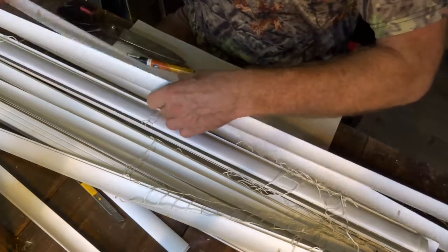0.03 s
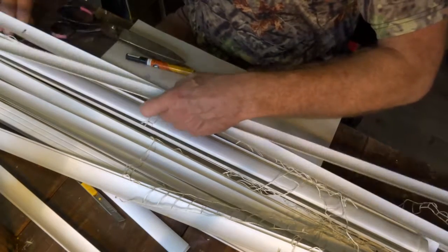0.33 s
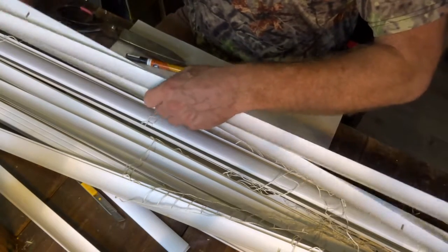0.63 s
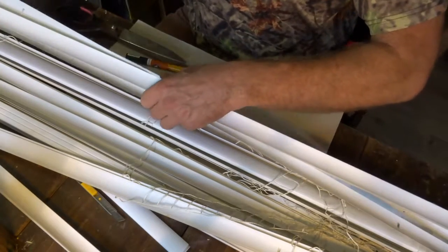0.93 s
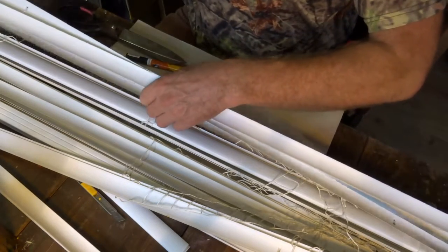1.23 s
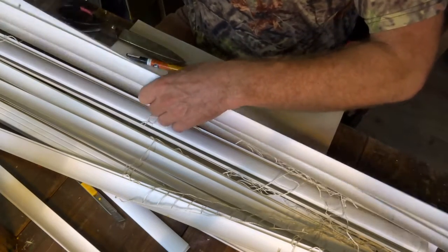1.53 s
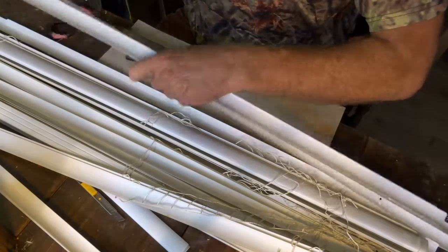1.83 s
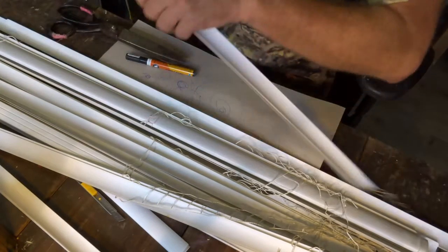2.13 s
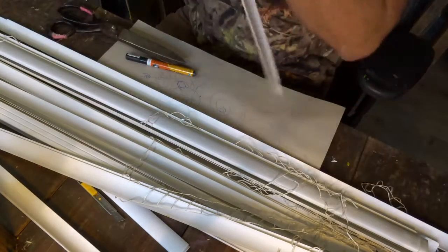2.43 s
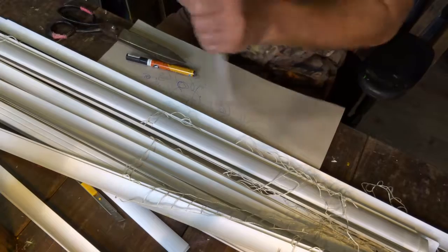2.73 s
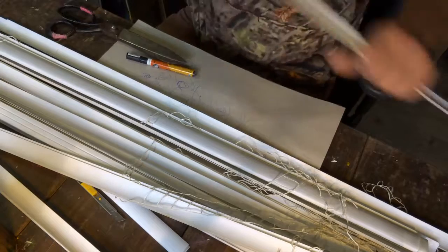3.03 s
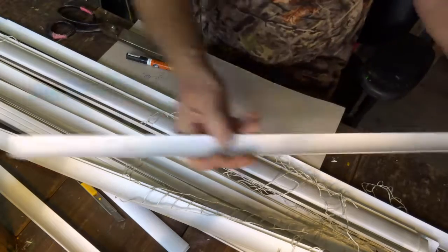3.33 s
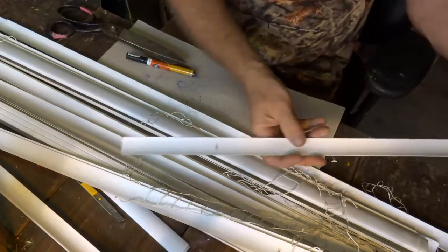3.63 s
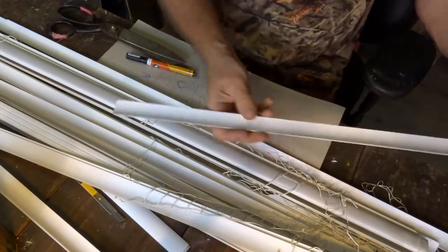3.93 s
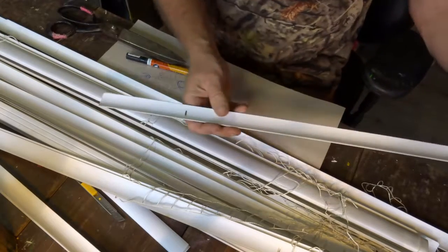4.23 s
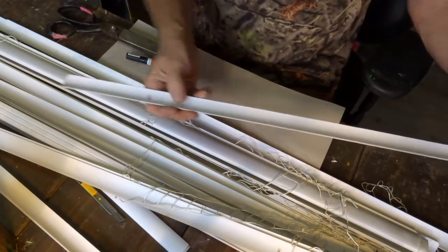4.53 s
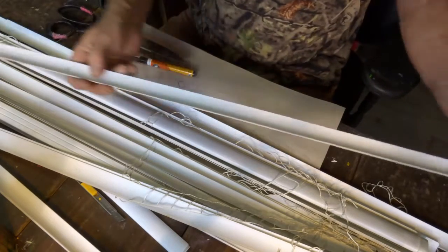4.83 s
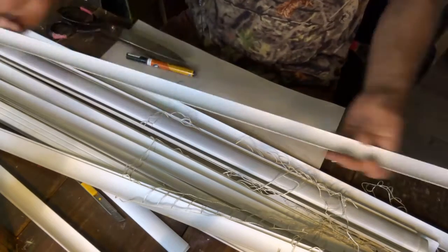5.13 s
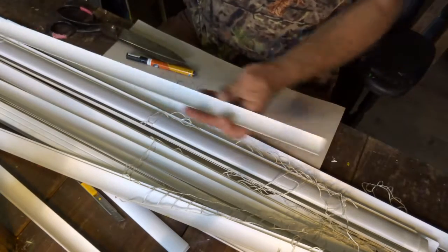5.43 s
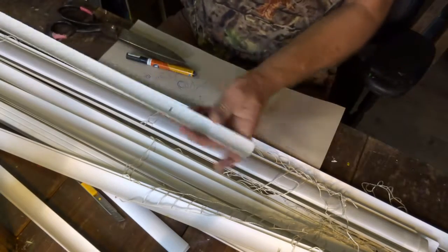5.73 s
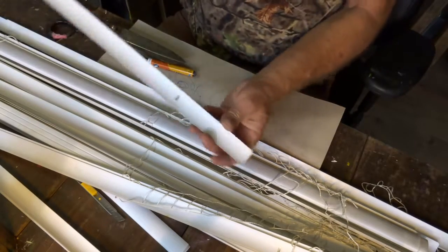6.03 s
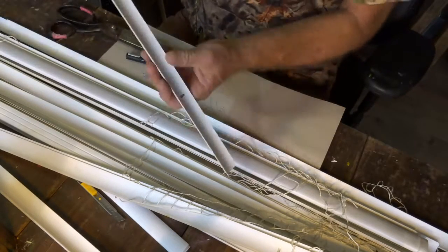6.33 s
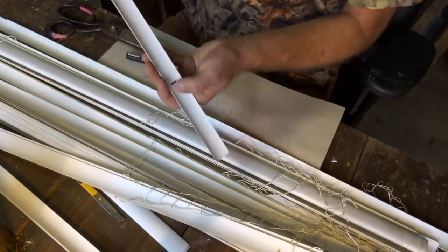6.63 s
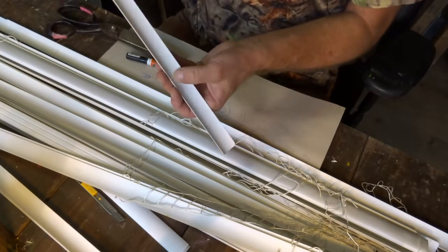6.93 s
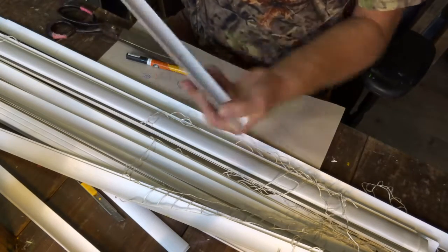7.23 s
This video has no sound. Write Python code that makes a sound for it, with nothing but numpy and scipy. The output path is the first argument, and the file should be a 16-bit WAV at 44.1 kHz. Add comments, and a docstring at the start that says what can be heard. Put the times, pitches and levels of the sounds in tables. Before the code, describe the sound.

Long plastic blind slats click and scrape as one is tugged out of a pile on a workbench, its thin edges snapping past the others. Its end then chatters against something solid in a loud, hollow clatter with dull thumps. Afterwards dry skin hisses softly along the slat in several strokes. The sounds are close, in a small, quiet workshop with short echoes.

```python
"""Long plastic blind slats click, scrape and knock as they are handled on a workbench.
One slat is tugged out of the pile: its thin edges catch and snap past the others. It is swung round,
and its end chatters and thumps against something solid. Then dry skin hisses along it in several strokes.
Each hit is a short push that makes the parts ring; each slide is a stream of tiny slips.
The small, quiet workshop adds short echoes, soft room noise and a thin, very high whine."""
import sys
import numpy as np
from scipy import signal
from scipy.fft import rfft, irfft
from scipy.io import wavfile
from scipy.ndimage import uniform_filter1d, map_coordinates

SR = 44100
rng = np.random.default_rng(int(sys.argv[2]) if len(sys.argv) > 2 else 0)


def store_pcm(level_fs):
    """Save levels as 16-bit WAV."""
    pcm = np.round(np.clip(level_fs, -1, 1) * 32767).astype(np.int16)
    wavfile.write(sys.argv[1], SR, np.atleast_2d(pcm).T)


N = 321048
TIME = np.arange(N) / SR

# Thin slat edges snap past each other. The "spot" is the place that is hit; it has a pitch of its own.
# (time [s], tick level [dB], clack compared with tick [dB], base ring time [s], spot pitch [Hz])
CLICKS = [(.1614, -10.5, -5, 0.023, 4040), (.208, -4.5, -5, .008, 12000), (0.253, -14, -7, 0.065, 9700),
          (.378, -19, -10, .01, 1980), (0.4008, -21, 3, .04, 1250), (0.4054, -7, -8, 0.032, 1130),
          (0.5217, -9.5, 2.5, 0.015, 2790), (.7495, -16, 2.5, 0.016, 2160), (.902, -15.5, -13, .024, 5900),
          (.9537, -18, -10.5, .041, 5330), (1.0778, -16, -24, .04, 9050), (1.3228, 1.5, -7, 0.021, 6900),
          (1.4198, -17.5, -9, 0.017, 1840), (1.653, -19, -16, .023, 3610), (1.6795, 1.5, -14, 0.0043, 5070),
          (1.7232, -13, -16, 0.036, 4550), (1.7448, -2, -5, 0.023, 5930),
          (1.788, -6.5, -6.5, 0.0089, 11800), (1.8781, -10, -19, 0.016, 3400),
          (1.8923, -7, -2.5, 0.01, 5940), (1.941, -16, 2, 0.037, 2340), (1.9649, -6.5, -8.5, 0.0085, 6000),
          (2.0794, -3, -12, .007, 7500), (2.0846, 0, -7.5, 0.0083, 8400), (2.0982, -1.5, -16, 0.068, 9800),
          (2.107, 0, -10, 0.067, 4660), (2.178, -7, -8, .08, 5550), (2.183, -3, -8, 0.064, 5760),
          (2.1893, 1, -11.5, 0.018, 5300), (2.2658, -8, -3.5, 0.02, 2000), (2.3021, -4, -14, 0.0066, 6300),
          (2.87, -1, -29, 0.023, 10600), (2.8748, 0, -25, 0.0056, 5940), (3.3602, -11, -13.5, 0.31, 12000),
          (3.4185, -8, -24, 0.025, 5940), (3.425, -5, -13, 0.022, 5830), (3.4616, -12.5, -6, 0.02, 3250),
          (3.4765, -11.5, -5.5, 0.05, 6200), (7.1259, -18, -13, 0.047, 2360)]
# A slat lands flat or its end chatters: (time [s], clack level [dB], base ring time [s], spot pitch [Hz])
CLACKS = [(0.4125, -9.5, 0.015, 1150), (0.5267, -9, 0.12, 1380), (0.8136, -17, .02, 1450),
          (1.334, -4, 0.015, 1120), (2.24, -13.5, 0.043, 1420), (2.6844, 2.5, 0.0098, 1350),
          (2.703, 4, 0.018, 1420), (2.711, -1, 0.019, 1610), (2.7159, 6, 0.012, 1540),
          (2.7226, 3, 0.039, 1790), (2.742, 6, .054, 1440), (2.7914, -6.5, 0.064, 1580),
          (2.861, -1, .02, 1350)]
# Something heavy takes the blow: (time [s], thud level [dB], base ring time [s], spot pitch [Hz])
THUMPS = [(0.5708, -15, 0.02, 545), (.648, -26, 0.036, 337), (2.7261, -4.5, 0.059, 346),
          (2.7488, -3, 0.059, 324), (2.786, -0.5, .022, 386), (2.8007, -8, .03, 566),
          (1.652, -25, 0.037, 300), (5.897, -32, .04, 340)]
# Tugs drag a slat over the others: (start [s], length [s], hiss strength [dB], scrape strength [dB])
TUGS = [(-.06, 0.1, -45, -51.5), (0.07, 0.22, -47.5, -50.5), (0.229, 0.085, -39, -49.5),
        (0.266, .2, -48, -49.5), (0.547, 0.2, -43.5, -49.5), (0.783, .32, -48.5, -52),
        (1.03, 0.09, -44, -60), (1.067, 0.076, -38, -48.5), (1.245, .07, -50.5, -59),
        (1.328, 0.08, -37.5, -59), (1.561, 0.12, -50.5, -52.5), (1.633, 0.14, -38.5, -39.5),
        (1.698, 0.082, -31.5, -39.5), (1.8, 0.076, -35, -39.5), (1.875, 0.21, -55, -56),
        (2.098, 0.1, -35, -42.5), (2.195, 0.17, -32, -49), (2.323, 0.16, -54.5, -60),
        (2.485, .12, -51, -56), (2.69, 0.17, -36, -38), (2.84, 0.082, -27, -47)]
# Slats shift under the hand: (time [s], scrape strength [dB])
SHIFTING = [(0, -55.5), (1.0, -55), (1.2, -60.5), (1.55, -70), (2.0, -49), (2.6, -63.5)]
# Strokes of skin along the slat:
# (start [s], length [s], hiss strength [dB], extra for the low rub [dB], extra for the finest hiss [dB])
WIPES = [(2.92, .12, -44, -10, -3), (3.0, .12, -40.5, -8, 0.5), (3.11, 0.072, -42, -3, -8),
         (3.17, 0.17, -45.5, -10, -3), (3.579, 0.047, -51.5, -5.5, -3), (3.68, 0.13, -51.5, -7.5, -5),
         (3.75, 0.086, -46, -13.5, -5), (3.82, 0.11, -43, -17, -8), (3.91, 0.19, -48.5, -16, -7),
         (4.4, 0.31, -52.5, -6.5, -10), (4.479, 0.23, -45.5, -10.5, -2), (4.98, 0.22, -60, -28, -3),
         (5.33, .14, -63.5, -24, 3), (5.47, .06, -56, -2.5, -19), (5.658, 0.22, -42.5, -14, -8),
         (5.84, 0.087, -53, -10, -12), (6.09, 0.19, -50, -14, -2), (6.2, 0.23, -41, -18.5, -4.5),
         (6.48, 0.085, -55, -27, -23), (6.56, .13, -49.5, -28, -12), (6.77, .2, -50.5, -14.5, -13),
         (7.09, 0.072, -45, -20, -23), (7.16, 0.16, -43, -17, -13)]

# The notes a part rings with when hit. A ring time (t60) is how long a sound takes to fade by 60 dB.
# (pitch [Hz], relative level [dB], ring time [s])
SLAT_NOTES = [(1155, -1, 0.21), (1250, -2, .13), (1323, -14, 0.24), (1454, -7.5, 0.082), (1616, 5, .13),
              (1690, -9, 0.043), (1930, -1, 0.063), (2163, -7, 0.066), (2830, 13, 0.1)]  # a bending slat
THUD_NOTES = [(233.4, 4, 0.11), (318, 6.5, 0.093), (353, 2.5, 0.2), (509.7, 8, 0.11), (637, 2, 0.25)]  # the heavy things it strikes
BOOM_NOTES = [(110, -1, 0.24), (133, -16, .25), (177, -5, 0.15), (234, 9, 0.29)]  # their deepest notes, heard only after hard blows

# A colour says how strong a sound is from bass to treble: (frequency [Hz], relative level [dB])
TICK_COLOUR = [(200, -43), (800, -26.5), (2500, 0.5), (4000, 1.5), (5800, 2), (8000, -1.5), (10700, 4.5),
               (12800, -4.5), (15500, -11.5)]  # a slat's thin edge
CLACK_COLOUR = [(60, -82), (200, -48), (600, -8.5), (900, 0), (1400, 0.5), (2100, 2.5), (3200, -2.5),
                (4500, -9.5), (9000, -17.5), (16000, -38)]  # a slat's hollow knock
THUD_COLOUR = [(40, -36), (100, -22), (170, -15), (240, 3.5), (320, 6), (400, 1.5), (500, 7), (630, 3),
               (800, -4), (1500, -42), (4000, -92)]  # a heavy thing being hit
BOOM_COLOUR = [(30, -22), (75, -25), (95, -12), (115, -7), (165, -6.5), (230, -2), (330, 2), (600, -24),
               (3000, -67)]  # the deep part of that hit
HISS_COLOUR = [(300, -63), (1500, -31), (3200, -25), (5000, -3), (6500, 2), (8000, 1), (10800, 5),
               (12800, -2.5), (15500, -4.5)]  # slat on slat, the bright part
SCRAPE_COLOUR = [(100, -27), (400, -21), (800, 9), (1300, 4.5), (2200, 10.5), (3200, 7), (5000, 5),
                 (10000, -42)]  # slat on slat, the hollow part
SKIN_COLOUR = [(400, -45), (2000, -44.5), (3600, -3.5), (4800, 2.5), (6500, 2), (8200, 0.5), (10000, 7),
               (11400, 8), (12600, -38), (15000, -36)]  # skin on slat, the main hiss
SKIN_LOW_COLOUR = [(200, -32), (900, -3), (1900, -1.5), (2500, 8.5), (3200, 10.5), (4000, 6), (5500, -12.5)]  # its lower rub
SKIN_FINE_COLOUR = [(4000, -58), (10500, -18), (12400, -2.5), (14000, -12), (15800, -10)]  # its finest hiss
AIR_COLOUR = [(25, -19), (60, -16.5), (110, -15), (180, -11.5), (290, -5.5), (700, -4.5), (1280, -3),
              (1860, -6.5), (2800, -5.5), (3900, -9), (9000, -11.5), (11500, -8.5), (13400, -16),
              (14750, -4), (16000, -22)]  # room noise

# Early echoes from the bench, the person and the walls: (delay [s], level [dB])
ECHOES = [(.0040, -8), (.0063, -13.5), (.0087, -22.5), (0.0093, -31)]
# How much a sound spreads to the left and right: (frequency [Hz], side compared with middle [dB])
ECHO_WIDTH = [(60, -26), (150, -56), (300, -44), (600, -15), (1400, -16), (2800, -19), (5000, -13),
              (15000, -11.5)]  # echoes
AIR_WIDTH = [(60, 3), (110, -11), (200, -12.5), (380, -8), (700, -4), (1290, -5), (2380, -8), (4400, -10.5),
             (8120, -15.5), (15000, -17.5)]  # room noise

CLICK_THUD_DB, CLICK_THUD_GROWTH = -26.5, 0.64  # thud under a 0 dB tick; dB it gains per dB of tick
CLACK_TICK_DB, CLACK_THUD_DB = -13, -18.5  # compared with the clack
THUMP_CLACK_DB, THUMP_TICK_DB = -7.5, -7  # compared with the thud
BOOM_DB, BOOM_GROWTH = -2.5, 2.36  # boom under a 0 dB thud; dB it gains per dB of thud
CATCH_S, CATCH_DB = 0.034, -39.5  # an edge hisses around its snap: length; offset from the tick level


def slat_hits():
    """Clicks, clacks and thumps all shake the same parts, each kind in its own mix."""
    parts = (struck_part(BOOM_COLOUR, BOOM_NOTES, notes_db=-14),
             struck_part(THUD_COLOUR, THUD_NOTES, notes_db=-1.5),
             struck_part(CLACK_COLOUR, SLAT_NOTES, notes_db=-9),
             unit(colour(TICK_COLOUR)))
    hits = [(time, CLICK_THUD_DB + CLICK_THUD_GROWTH * db, db + hollow_db, db, t60, hz)
            for time, db, hollow_db, t60, hz in CLICKS]
    hits += [(time, db + CLACK_THUD_DB, db, db + CLACK_TICK_DB, t60, hz) for time, db, t60, hz in CLACKS]
    hits += [(time, db, db + THUMP_CLACK_DB, db + THUMP_TICK_DB, t60, hz)
             for time, db, t60, hz in THUMPS]
    track = np.zeros(N + SR)
    for time, *settings in hits:
        start = int(time * SR)
        for sound in one_hit(*settings, parts):
            track[start:start + len(sound)] += sound
    return track[:N]


def one_hit(thud_db, clack_db, tick_db, t60, spot_hz, parts):
    """One hit makes four sounds: a boom, a thud, the slat's hollow clack and a tick from its edge."""
    levels_db = BOOM_DB + BOOM_GROWTH * thud_db, thud_db, clack_db, tick_db
    ring_times = .03, t60 + 0.0086, 1.37 * t60, 1.42 * t60
    return [gain(db) * blow(ring_s, part, spot_hz)
            for db, ring_s, part in zip(levels_db, ring_times, parts)]


def blow(t60, part, spot_hz, spot_db=5.0, snap=0.56, count=4096):
    """A snap, then waves run to and fro in the part, and the spot that was hit adds its own pitch."""
    waves = rfft(rng.standard_normal(count) * fade(t60, count))
    even_waves = irfft(waves / np.abs(waves))  # a short blow feeds all frequencies about equally
    push = unit(even_waves * fade(2 * t60, count))
    push[0] += snap
    sound = signal.fftconvolve(push, part)
    return unit(sound + gain(spot_db) * resonate(sound, spot_hz, sharpness=9.3))


def struck_part(points, notes, notes_db, count=16384):
    """How a part answers a tap: a dull knock, plus notes that ring on."""
    tones = sum(gain(db) * fade(t60, count) * np.sin(2 * np.pi * (hz * TIME[:count] + rng.random()))
                for hz, db, t60 in notes)
    knock = unit(colour(points))
    return np.pad(knock, (0, count - len(knock))) + gain(notes_db) * unit(tones)


def pile_scraping():
    """Slat edges catch and slip on their neighbours; the long strips bend and rumble."""
    starts, lengths, hiss_db, scrape_db = np.transpose(TUGS)
    tug_hiss, tug_scrape = (strokes(starts, lengths, db, curve=0.45) for db in (hiss_db, scrape_db))
    snap_times, tick_db = np.transpose(CLICKS)[:2]
    catch_lengths = np.full(len(snap_times), CATCH_S)
    catching = strokes(snap_times - CATCH_S / 2, catch_lengths, tick_db + CATCH_DB, curve=1)
    shifting = gain(np.interp(TIME, *np.transpose(SHIFTING), right=-120))
    hiss_gain, scrape_gain = np.hypot(tug_hiss, catching), np.hypot(tug_scrape, shifting)
    force = slips(per_second=1500, spread_db=5.0, smooth=0.99) * gain(2.2 * wander(55))
    bright = sliding_spot(force, centre_hz=6300, spot_db=-8.0, sharpness=11.8)
    hollow = sliding_spot(force, centre_hz=1914, spot_db=-12.0, sharpness=11.5)
    hiss = tint(bright * hiss_gain, HISS_COLOUR) * gain(-8.5)
    scrape = tint(hollow * scrape_gain, SCRAPE_COLOUR) * gain(-6.5)
    rumble = tint(force * scrape_gain, THUD_COLOUR) * gain(-21)
    return hiss + scrape + rumble


def hand_wiping():
    """Dry skin hisses along the slat with a wavering grip that takes hold and lets go gently."""
    starts, lengths, hiss_db, low_db, fine_db = np.transpose(WIPES)
    rub = slips(per_second=9000, spread_db=-2.5, smooth=1.14) * gain(.5 * wander(50))
    rub = sliding_spot(rub, centre_hz=4650, spot_db=-11, sharpness=13.6)
    # a very close echo shifts as the hand moves, which changes the colour
    delay_s = 0.000586 * (1 + 0.11 * wander(2.8))
    bench_echo = gain(-12.5) * map_coordinates(rub, [(TIME - delay_s) * SR], order=3)
    hiss, low, fine = ((rub + bench_echo) * strokes(starts, lengths, db, curve=0.51, ease_s=0.032)
                       for db in (hiss_db, hiss_db + low_db, hiss_db + fine_db))
    return (tint(hiss, SKIN_COLOUR) * gain(-4.0) + tint(low, SKIN_LOW_COLOUR) * gain(-2.0)
            + tint(fine, SKIN_FINE_COLOUR) * gain(-0.5))


def slips(per_second, spread_db, smooth):
    """Rubbing is many tiny slips of uneven size on top of a smooth hiss."""
    sizes = gain(spread_db * np.minimum(rng.exponential(size=N), 3))
    slipping = rng.random(N) < per_second / SR
    grains = slipping * sizes * rng.standard_normal(N)
    force = grains / grains.std() + smooth * rng.standard_normal(N)
    return force / force.std()


def sliding_spot(force, centre_hz, spot_db, sharpness):
    """As the touching point travels along the slat, different pitches swell and fade at random."""
    pitches = centre_hz * np.geomspace(.55, 1.8, 10)
    ringing = sum(gain(5 * np.tanh(wander(14))) * resonate(force, hz, sharpness) for hz in pitches)
    return force + gain(spot_db) * ringing


def strokes(starts, lengths, levels_db, curve, ease_s=0):
    """Loudness of hand movements that speed up and slow down; curve sets how it follows the speed."""
    power = np.zeros(N)
    for start, length, db in zip(starts, lengths, levels_db):
        moving = (TIME > start) & (TIME < start + length)
        speed = np.abs(np.sin(np.pi * (TIME[moving] - start) / length))
        power[moving] += (gain(db) * speed ** curve) ** 2
    return uniform_filter1d(np.sqrt(power), max(int(ease_s * SR), 1))


def workshop_echoes(slats, places):
    """The sound moves among several places along the slats, each with its own echoes."""
    shares = np.array([gain(8 * wander(25)) for _ in range(places)])
    shares /= np.sqrt(np.sum(shares ** 2, axis=0))
    return sum(ring(slats * share, echo_pattern()) for share in shares)


def echo_pattern(bass_t60=0.39, treble_t60=0.24, tail_db=-5.0, count=20000):
    """How the room answers a tap: a few early echoes, then a short wash that lasts longer in the bass."""
    noise = rng.standard_normal(count)
    bass = signal.sosfilt(signal.butter(1, 900, fs=SR, output="sos"), noise)
    tail = bass * fade(bass_t60, count) + (noise - bass) * fade(treble_t60, count)
    build_up = np.clip((TIME[:count] - .002) / 0.0065, 0, 1)
    response = gain(tail_db) * unit(build_up * tail)
    for delay, db in ECHOES:
        scatter = unit(rng.standard_normal(128) * fade(.004, count=128))  # clutter smears each echo
        start = int(delay * SR)
        response[start:start + len(scatter)] += gain(db) * scatter
    return response


def background(air_db=-59.5, whine_hz=14760, whine_db=-74):
    """Soft, steady room noise and a thin, very high whine that flickers."""
    air = tint(rng.standard_normal(N), AIR_COLOUR) * gain(air_db + 0.11 * wander(1.62))
    phase = 2 * np.pi * whine_hz * TIME
    whine = wander(200) * np.sin(phase) + wander(200) * np.cos(phase)
    return air + gain(whine_db) * whine


def gain(db):
    """Turn decibels into a number to multiply by."""
    return 10 ** (np.asarray(db) / 20)


def unit(sound):
    """Scale a sound so that its energy is 1."""
    return sound / np.sqrt(np.sum(sound ** 2))


def fade(t60, count):
    """A fade, count samples long, that drops 60 dB every t60 seconds."""
    return np.exp(-np.log(1000) * TIME[:count] / max(t60, 1e-3))


def wander(per_second):
    """A random drift, about 1 in size, that heads for a new value per_second times a second."""
    return np.interp(TIME * per_second, np.arange(4096), rng.standard_normal(4096)) * np.sqrt(3 / 2)


def resonate(sound, hz, sharpness):
    """Keep the part of a sound near one pitch; more sharpness keeps a narrower part."""
    return signal.lfilter(*signal.iirpeak(hz, sharpness, fs=SR), sound)


def ring(sound, response):
    """Play a sound through something, given its response to a single tap."""
    return signal.oaconvolve(sound, response)[:N]


def colour(points, size=2048):
    """Turn a colour table into the response to a single tap."""
    hz, db = np.transpose(points)
    curve_db = np.interp(np.log(np.fft.rfftfreq(size, 1 / SR) + 1), np.log(hz), db)
    # folding the second half onto the first makes the response start at the tap, never before it
    folded = irfft(np.log(gain(curve_db)))
    folded[1:size // 2] *= 2
    folded[size // 2 + 1:] = 0
    return irfft(np.exp(rfft(folded)))


def tint(sound, points):
    """Give a sound a colour; plain white noise keeps its power."""
    return ring(sound, unit(colour(points)))


def scene():
    """The slats sound the same left and right; echoes and room noise add a little width."""
    slats = slat_hits() + pile_scraping() + hand_wiping()
    middle = slats + workshop_echoes(slats, places=5) + background()
    side = ring(workshop_echoes(slats, places=2), colour(ECHO_WIDTH))
    side += ring(background(), colour(AIR_WIDTH))
    return np.array([middle + side, middle - side])


def record(dry):
    """Thin out the deep bass and cut off the very highest treble."""
    bass_cut = signal.butter(2, 85, "high", fs=SR, output="sos")
    treble_cut = signal.ellip(10, .2, 70, 15950, fs=SR, output="sos")
    return signal.sosfilt(treble_cut, signal.sosfilt(bass_cut, dry))


dry = scene()
out = record(dry)
store_pcm(out)
```